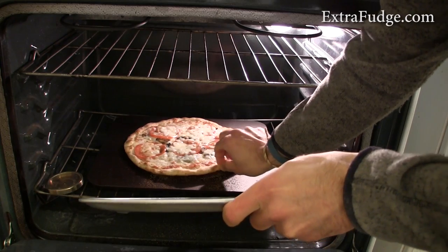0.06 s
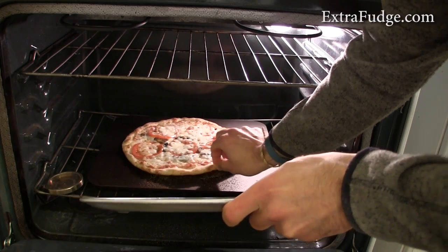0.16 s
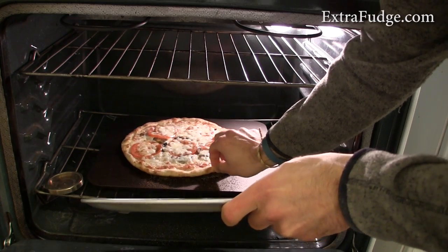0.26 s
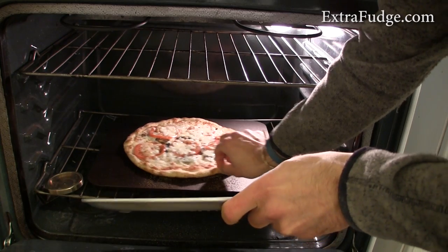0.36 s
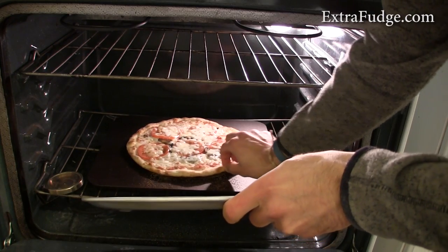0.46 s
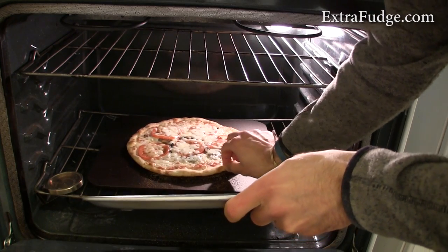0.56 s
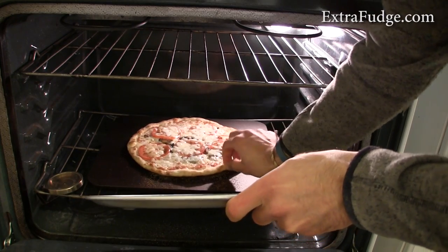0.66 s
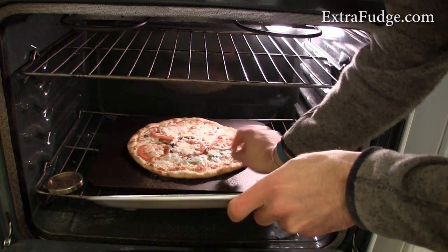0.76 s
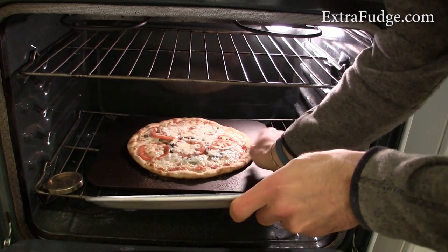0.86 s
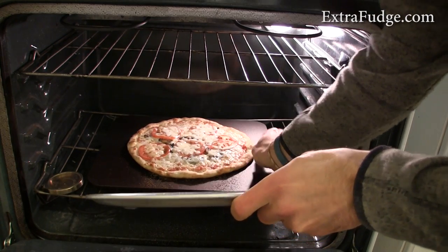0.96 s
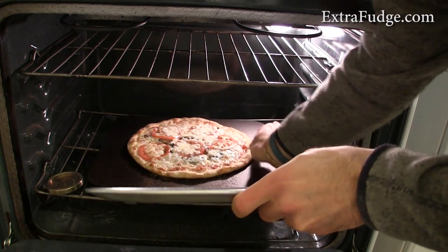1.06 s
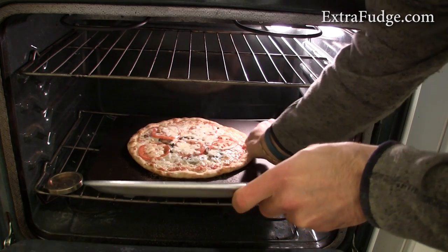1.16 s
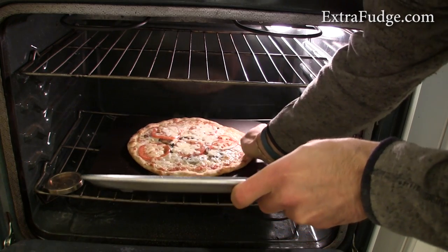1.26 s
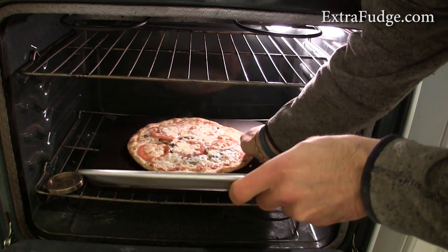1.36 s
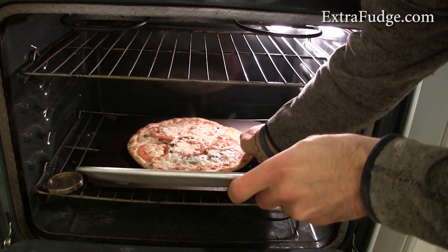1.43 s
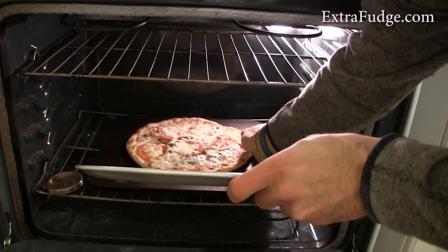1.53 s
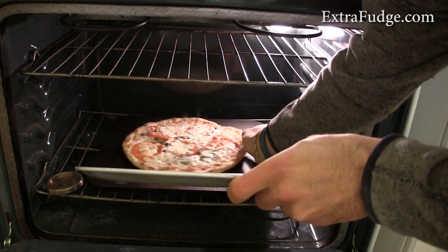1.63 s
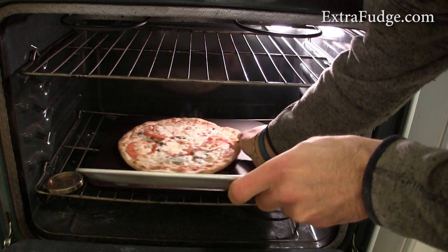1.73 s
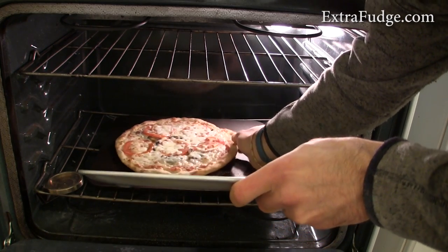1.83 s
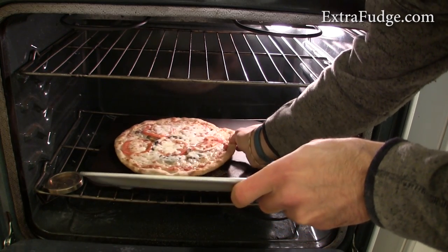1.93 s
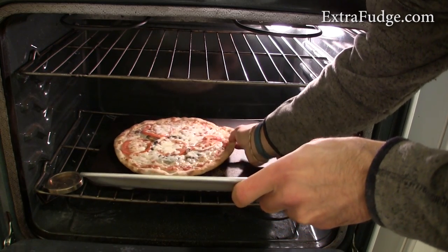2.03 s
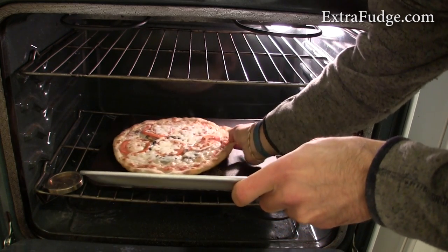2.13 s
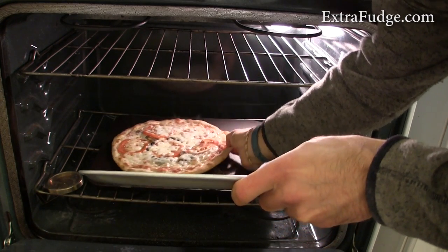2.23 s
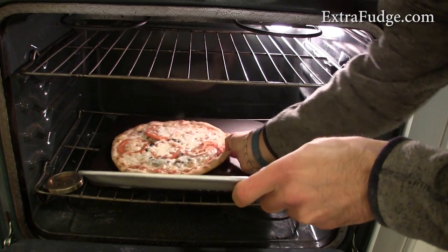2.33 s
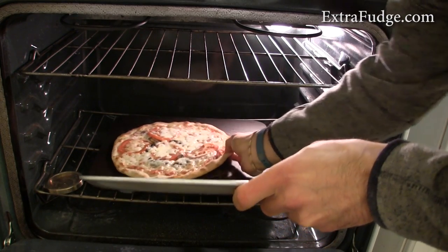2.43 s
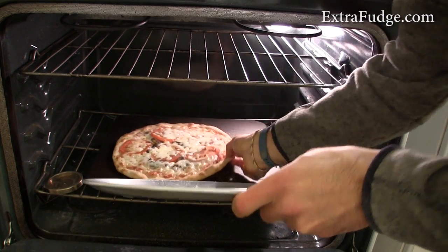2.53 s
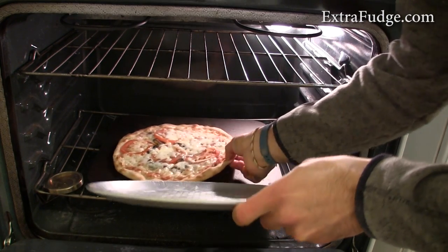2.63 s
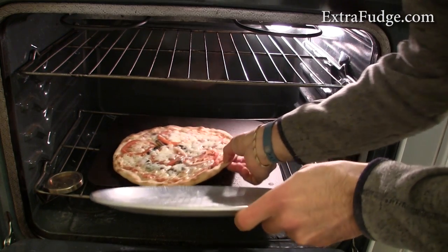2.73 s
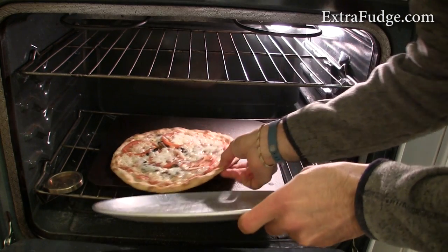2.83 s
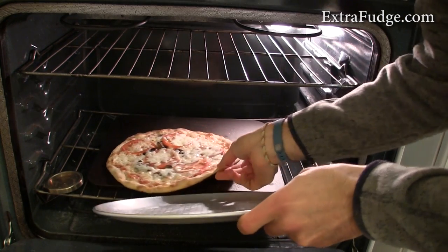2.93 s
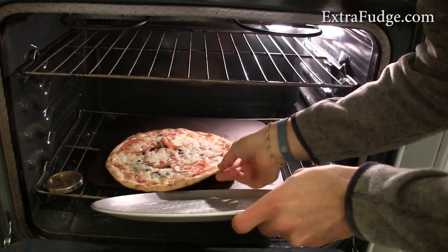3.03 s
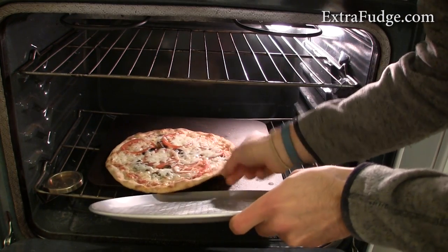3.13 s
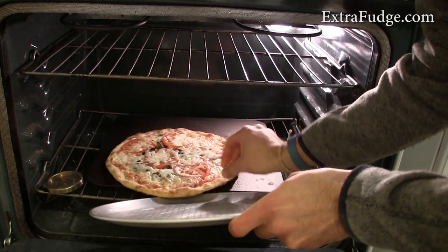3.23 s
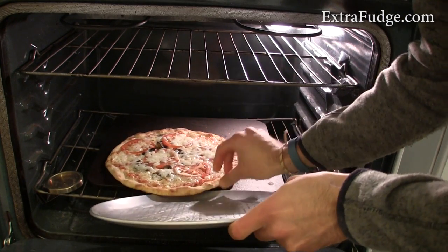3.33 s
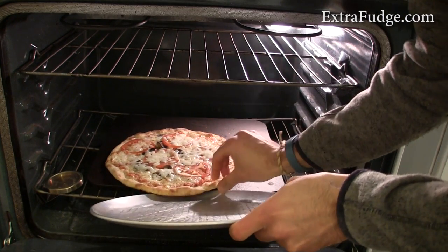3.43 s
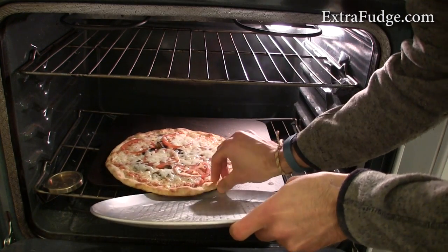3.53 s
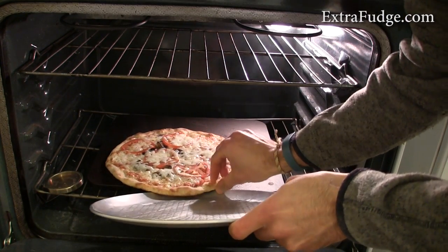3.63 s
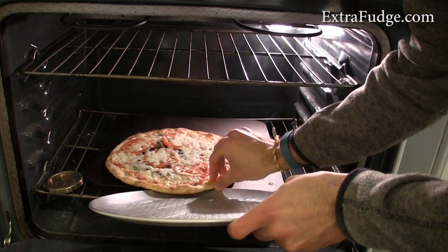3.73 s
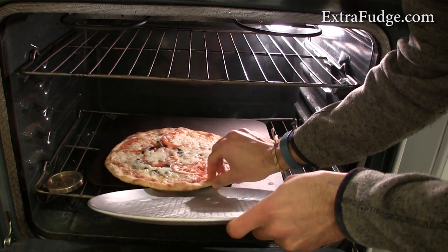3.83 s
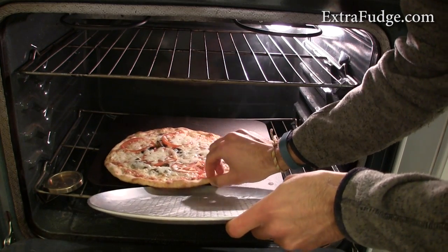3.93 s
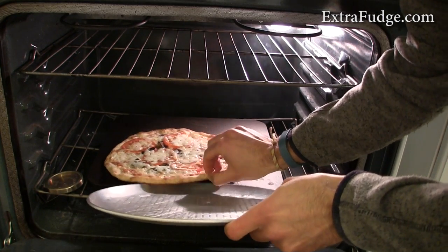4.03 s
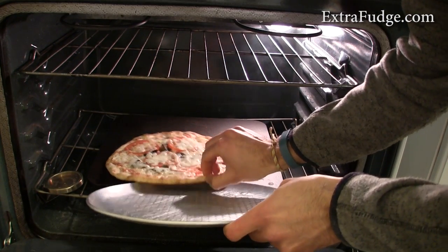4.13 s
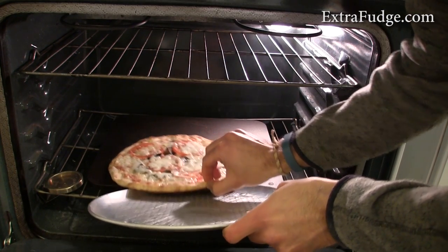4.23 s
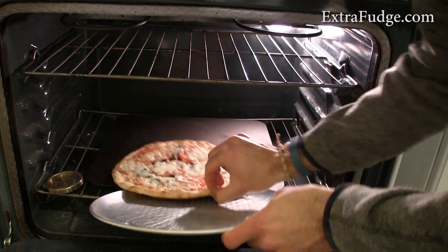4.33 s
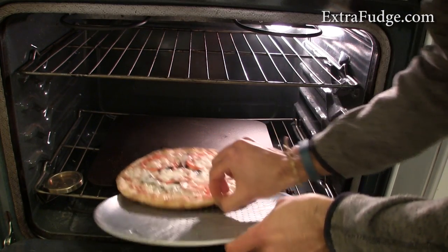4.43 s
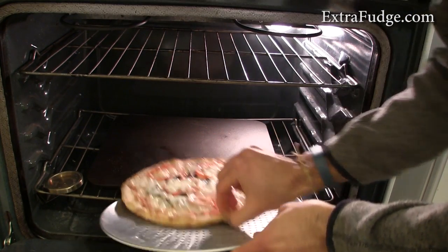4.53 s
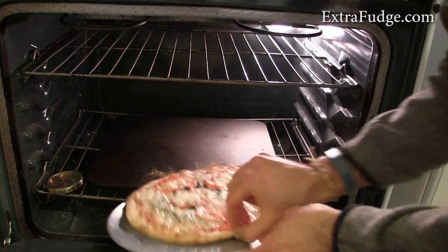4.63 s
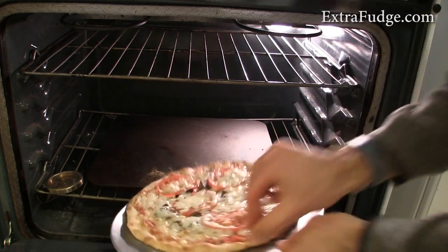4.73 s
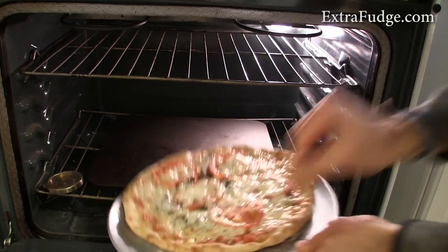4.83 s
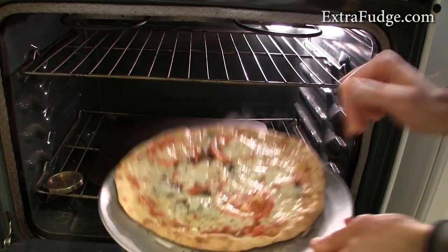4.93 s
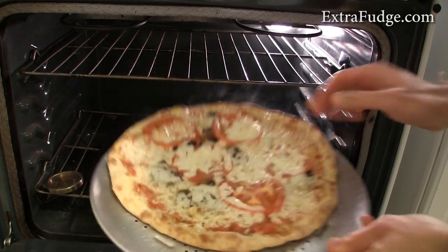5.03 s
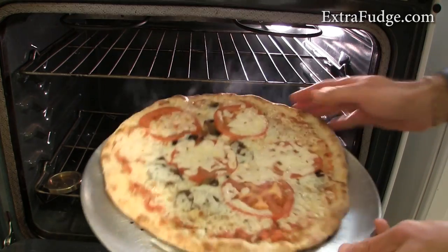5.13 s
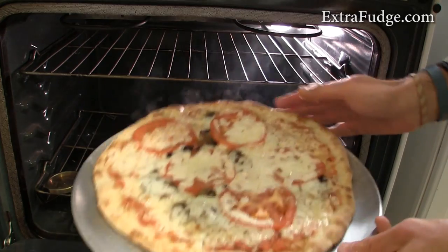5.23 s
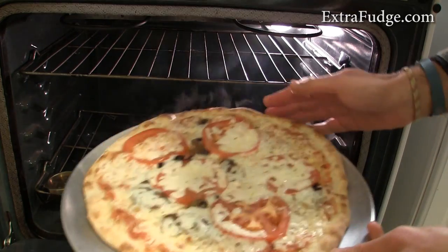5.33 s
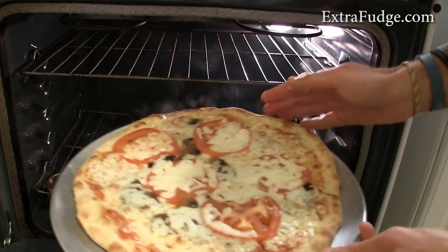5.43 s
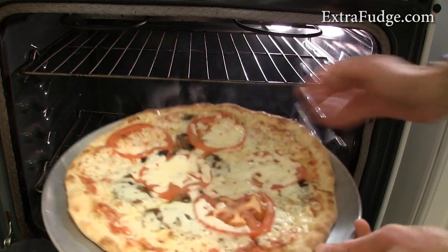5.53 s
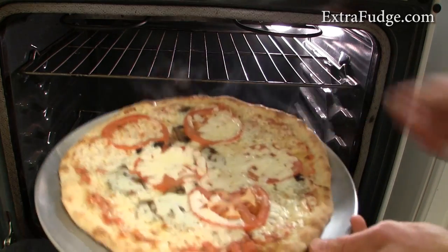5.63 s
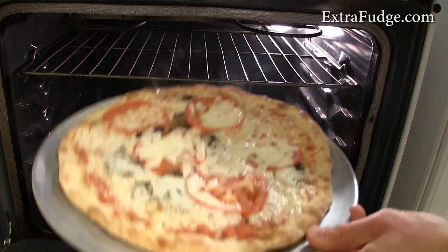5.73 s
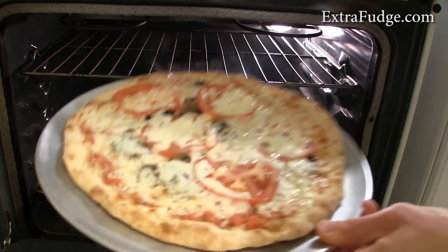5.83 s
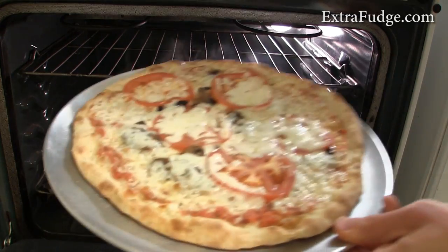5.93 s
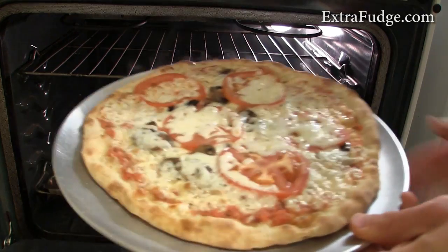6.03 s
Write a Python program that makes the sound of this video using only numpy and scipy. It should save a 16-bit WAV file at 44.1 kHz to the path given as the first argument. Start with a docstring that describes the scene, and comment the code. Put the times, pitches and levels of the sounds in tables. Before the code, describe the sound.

Rough, uneven scraping of pizza crust on steel in an oven, with short metal knocks, small crackles and faint sizzling.

```python
"""A baked pizza is dragged in jerks over a steel slab in an open oven and slides onto a thin metal pan.
Crumbs of crust catch and slip in a dense rasp that rings the slab, then the pan. Metal knocks, crust
cracks, fat crackles and sleeves rustle around it, over a faint bed of air, sizzling cheese and oven hum.
Close and mono, in a small kitchen."""
import sys
import numpy as np
from scipy import signal
from scipy.fft import rfft, irfft
from scipy.io import wavfile
from scipy.ndimage import uniform_filter1d

SR = 44100
rng = np.random.default_rng(int(sys.argv[2]) if len(sys.argv) > 2 else 0)


def master_out(mix):
    """Clip the mix to full scale and print it as 16-bit PCM to the path in sys.argv[1]."""
    frames = np.transpose(np.atleast_2d(mix))
    ceiling = np.clip(frames, -1, 1)
    pcm = np.round(ceiling * 32767).astype(np.int16)
    wavfile.write(sys.argv[1], SR, pcm)


N = 267687
T = np.arange(N) / SR

# Tone curves of the kitchen bed and of crust rasping on slab and pan: f/Hz, level/dB
BED_EQ = [(25, -13), (116, -2), (361, -3), (672, 2), (1050, -6.5), (1930, -31.5), (2200, -26), (3490, -19),
          (4950, -33.5), (5670, -24), (6310, -82), (13400, -21), (15800, -36)]
SLAB_EQ = [(35, -43), (60, -34), (136, -10), (227, -7.5), (300, -7.5), (361, -11.5), (406, -3), (604, -3),
           (1270, -6.5), (1650, -5.5), (3310, -8), (8220, -9), (12500, -4.5), (15800, -14)]
PAN_EQ = [(35, -110), (60, -39), (255, 4), (379, -11.5), (489, 0), (604, -1.5), (919, -1.5), (1220, -6),
          (12800, -8.5), (15800, -11.5)]
# Resonances and dips laid over a tone curve: f/Hz, width/Hz, level/dB
RUSTLE_MODES = [(5300, 150, 12), (10500, 200, 5), (12200, 500, 4)]
SLAB_MODES = [(145, 25, 7), (230, 20, 4), (410, 40, 3), (660, 80, 3), (940, 40, 4), (1184, 30, 4),
              (1420, 40, 4), (1650, 35, 5), (1775, 35, 4), (2070, 80, 4), (2350, 40, 3), (3044, 80, 3),
              (3320, 70, 3), (4015, 50, 4), (5600, 700, 3)]
BACK_MODES = [(160, 120, -6), (455, 100, 5), (700, 200, -3), (1300, 250, -3), (910, 90, 6), (2200, 300, -7),
              (2850, 450, 4)]  # pizza at the back of the slab
EDGE_MODES = [(3400, 1000, 4)]  # pizza at its edge
PAN_MODES = [(490, 50, 5), (921, 95, 4), (1100, 150, -5), (1457, 15, 5), (1750, 40, 4), (2190, 60, 5),
             (2730, 50, 4), (4020, 40, 4), (4450, 400, -5), (4730, 70, 3), (5680, 70, 4), (6180, 70, 5),
             (7020, 280, 4), (8780, 100, 4), (12500, 400, 3)]
OVEN_NOTCH = (4860, 380, -11)  # the cavity swallows one band
# Pitches of small bursting fat bubbles: f/Hz
BUBBLE_HZ = (1500, 2700, 3600, 5700, 7200, 9000, 11000, 13000)
# Sleeves and fingers: t/s, level/dB
RUSTLES = [(.9, -68), (1.42, -69), (3.378, -58), (5.52, -66), (5.878, -66.5)]
# Crust cracks and fat spits: t/s, peak level/dB, f/Hz
CRACKS = [(0.663, -53, 4500), (1.432, -46, 10200), (2.167, -32, 12200), (2.179, -31, 12700),
          (2.194, -28, 12800), (2.217, -39, 9000), (3.0594, -35, 11000), (3.281, -49, 11000),
          (4.816, -21, 4800), (5.512, -45, 11500), (5.558, -49.5, 5500), (5.879, -51, 5600)]
# Blows on the metal: t/s, peak level/dB ahead of the pan's resonances, f/Hz, t60/s
BLOWS = [(0.346, -44, 1740, 0.036), (0.413, -36, 1810, 0.022), (0.711, -43.5, 2780, 0.097),
         (0.863, -42, 610, 0.12), (0.865, -47, 3000, 0.06), (2.009, -46, 640, 0.051),
         (2.167, -37.5, 614, 0.034), (2.199, -38.5, 443, 0.039), (3.247, -44.5, 400, 0.13),
         (3.844, -41, 3500, 0.03), (4.813, -23.5, 830, 0.03), (4.818, -23, 750, 0.04),
         (5.329, -35.5, 434, 0.12)]
# The pan's one long ring after the loudest knock: t/s, f/Hz, peak level/dB, t60/s
LONG_RING = (4.813, 1457, -54, .95)
# Short shoves at speed: start t/s, end t/s, start level/dB, end level/dB, attack/s, release/s,
# then band trims: low mid/dB, high mid/dB, treble/dB
SHORT_SHOVES = [(0.147, 0.298, -57, -57, 0.086, 0.11, -6, -1.5, -14),
                (0.456, 0.548, -49, -55.5, 0.06, 0.081, -2.5, 1.5, -9.5),
                (0.709, 0.746, -58, -66.5, 0.02, 0.033, -5, 1, -20),
                (0.831, 0.849, -64, -60.5, 0.057, 0.024, -9, -13, -5),
                (1.5, 1.644, -75.5, -66.5, 0.041, 0.056, 7.5, 4, -9),
                (1.671, 1.92, -50.5, -52.5, 0.062, 0.077, 2, 3.5, -10),
                (2.034, 2.052, -54.5, -54.5, 0.059, 0.067, -1.5, 0, -15),
                (3.883, 3.955, -66, -67, 0.052, 0.068, 7.5, 13, -1.5),
                (5.265, 5.4, -45.5, -45, 0.075, 0.055, 3.5, 1.5, 2.5),
                (5.453, 5.471, -53, -60.5, 0.023, 0.033, 10.5, 7, 8.5)]
# Breakpoints of the two long pulls: t/s, level/dB, then band trims: low mid/dB, high mid/dB, treble/dB
LONG_PULLS = [
    [(2.14, -68, -3, -9, -3), (2.17, -63.5, 6.5, 5.5, 1), (2.27, -47.5, -7.5, -3, -16),
     (2.45, -51.5, 1, 3, -13), (2.68, -47, -7.5, -3, -15), (2.74, -50, -2, -0.5, -15),
     (2.92, -50, 3.5, 8, -8), (3.05, -54.5, 10, 8.5, -7), (3.065, -56.5, 11.5, 9, 9),
     (3.17, -58, -2.5, -9.5, -10.5), (3.285, -66.5, 1, -20, -3), (3.4, -65.5, -4, 6, -11)],
    [(4.02, -71.5, -1, 8, -6), (4.12, -52.5, 3, 8, -3.5), (4.23, -39.5, -5, 2.5, -9), (4.32, -52, 9, 12, 1),
     (4.5, -51.5, 13.5, 14.5, 6), (4.57, -47.5, 14.5, 8.5, 4), (4.66, -35, -6, -4, -7),
     (4.745, -43, 0.5, 0.5, 2.5), (4.8, -49.5, 2.5, 1, -4), (4.82, -52.5, 4, 7.5, 4.5),
     (4.87, -61.5, 2, 4, -10), (4.96, -86, 6, 3, 3)],
]
# Faint hiss of the resting crust: level/dB, then the same three trims
REST_ON_SLAB, REST_ON_PAN = (-71.5, -9, -7, -3.5), (-67.5, -16, -12.5, -10)
# The pizza's path, as crossfade points: t/s
LEAVES_BACK_S, AT_EDGE_S = (2.08, 2.16), (4.28, 4.47, 4.55, 4.63)
ONTO_PAN_S, CARRIED_CLOSE_S = (4.7, 5.0), (5.1, 5.9)


def undb(db):
    """Decibels to gain."""
    return 10 ** (np.asarray(db) / 20)


def level(x, db):
    """Set the RMS level."""
    return x * undb(db) / np.sqrt(np.mean(x ** 2))


def colour(x, curve, modes=()):
    """Minimum-phase EQ: a smooth tone curve with resonances on it."""
    size = 2 ** 14
    f = np.maximum(np.fft.rfftfreq(size, 1 / SR), 1)
    hz, db = np.transpose(curve)
    power = undb(2 * np.interp(np.log(f), np.log(hz), db))
    for mode_hz, width, peak_db in modes:
        power = power * (1 + (undb(2 * peak_db) - 1) / (1 + (2 * (f - mode_hz) / width) ** 2))
    cepstrum = irfft(np.log(power) / 2)
    cepstrum[1:size // 2] *= 2  # folded forward, so the ring follows the hit
    cepstrum[size // 2 + 1:] = 0
    return signal.oaconvolve(x, irfft(np.exp(rfft(cepstrum))))[:len(x)]


def band(x, lo_hz, hi_hz, order=2):
    """Gentle band-pass."""
    sos = signal.butter(order, [lo_hz, min(hi_hz, 20000)], "band", fs=SR, output="sos")
    return signal.sosfilt(sos, x)


def lows(x, hz):
    """Zero-phase low-pass; subtract it to get the highs."""
    return signal.sosfiltfilt(signal.butter(2, hz, fs=SR, output="sos"), x)


def drift(per_s):
    """Smoothed sample-and-hold modulator with an RMS of 1."""
    held = rng.standard_normal(4000)[(T * per_s).astype(int) % 4000]
    hold = int(SR / per_s)
    return level(uniform_filter1d(uniform_filter1d(held, hold), hold), 0)


def grains(per_s, cap_db, spread_db=2.5):
    """Random clicks, many small and a few large."""
    chance, polarity, size = rng.random((3, N))
    size_db = np.minimum(-spread_db * np.log(size + 1e-9), cap_db)
    return (chance < per_s / SR) * np.sign(polarity - .5) * undb(size_db)


def burst(at_s, peak_db, hz, t60, edge_ratio, strike=5):
    """A click with a short noise tail, filtered around one pitch."""
    t = np.arange(SR // 5) / SR
    hit = (rng.standard_normal(len(t)) + strike * (t == 0)) * undb(-60 * t / t60)
    hit = band(hit, hz / edge_ratio, hz * edge_ratio, order=1)
    hit = hit * undb(peak_db) / np.abs(hit).max()
    return np.bincount(int(at_s * SR) + np.arange(len(t)), hit, N + SR)[:N]


def room(x, t60=.5, treble_t60=.073, wet_db=-24):
    """A dense kitchen tail that loses its treble first."""
    t = np.arange(SR // 2) / SR
    noise = rng.standard_normal(len(t)) * (t > .003)
    body = band(noise, 53, 2200, order=1)
    tail = body * undb(-60 * t / t60) + (noise - body) * undb(-60 * t / treble_t60)
    return x + signal.oaconvolve(x, tail / np.linalg.norm(tail) * undb(wet_db))[:N]


def oven(x, count=12, t60=.09, wet_db=-6, shifts_per_s=30):
    """Sheet walls and racks ring; cycling through short tails suggests hands and pizza moving."""
    t = np.arange(SR // 5) / SR
    out = x
    for k in range(count):
        ring = rng.standard_normal(len(t)) * undb(-60 * t / t60) * (t > .001)
        send = np.maximum(np.cos(2 * np.pi * (T * shifts_per_s - k) / count), 0) * np.sqrt(4 / count)
        out = out + signal.oaconvolve(x * send, ring / np.linalg.norm(ring) * undb(wet_db))[:N]
    return out / np.sqrt(1 + undb(2 * wet_db))


def kitchen_bed(hum_hz=118, hum_db=-80.5):
    """Wavering air, a sizzle of bursting fat bubbles that flares and dies down, and mains hum."""
    air = level(colour(rng.standard_normal(N), BED_EQ), db=-67.5)
    flare = undb(1.5 * drift(per_s=9))
    bubbles = sum(band(grains(per_s=160, cap_db=7), hz / 1.12, hz * 1.12) / np.sqrt(hz)
                  for hz in BUBBLE_HZ)
    sizzle = level(colour(bubbles * flare, BED_EQ), db=-68)
    hum = undb(hum_db + 1.8 * drift(per_s=22)) * np.sqrt(2) * np.sin(2 * np.pi * hum_hz * T)
    return oven(air * undb(2.7 * drift(per_s=17)) + sizzle) + hum


def fat_crackle(far_db=-75.5, near_db=-69):
    """Sparse dry clicks of hot fat, louder as the pizza is carried close."""
    clicks = level(band(grains(per_s=70, cap_db=8), 2500, 10000), 0)
    return clicks * undb(np.interp(T, CARRIED_CLOSE_S, (far_db, near_db)))


def sleeve_rustle(rise_db_per_s=504, fade_db_per_s=138):
    """Sleeves and fingers brush in bright, fibrous grains: fast attack, slower fade."""
    bright_eq = [(2500, -6), (4800, -2), (5600, 3), (9500, 0), (13000, 3), (16000, -14)]
    fibres = colour(grains(per_s=3500, cap_db=15, spread_db=3), bright_eq, RUSTLE_MODES)
    envelope = sum(undb(db + np.minimum(rise_db_per_s * (T - s), fade_db_per_s * (s - T)))
                   for s, db in RUSTLES)
    return level(fibres, 0) * envelope


def crust_cracks():
    """Crust snaps and fat spits in dry, bright ticks."""
    return sum(burst(s, db, hz, t60=.036, edge_ratio=1.15) for s, db, hz in CRACKS)


def pan_knocks():
    """Blows ring the thin pan; one mode sings on after the loudest."""
    blows = sum(burst(s, db, hz, t60, edge_ratio=1.25) for s, db, hz, t60 in BLOWS)
    s, hz, db, t60 = LONG_RING
    since = np.maximum(T - s, 0)
    ring = np.sin(2 * np.pi * hz * since) * undb(db - 60 * since / t60)
    return colour(blows, [(20, 0), (20000, 0)], PAN_MODES) + ring


def slab(push, strong=1.4, weak=.3):
    """The steel's tone follows the pizza's place; odd and even modes trade off as the contact wanders."""
    back = np.interp(T, LEAVES_BACK_S, (1, 0))
    edge = np.interp(T, AT_EDGE_S, (0, 1, 1, 0))
    sway = (1 + np.tanh(drift(per_s=8))) / 2
    out = 0
    for share, emphasis in ((sway, (strong, weak)), (1 - sway, (weak, strong))):
        modes = [(hz, width, db * emphasis[k % 2]) for k, (hz, width, db) in enumerate(SLAB_MODES)]
        for here, place_modes in ((back, BACK_MODES), (edge, EDGE_MODES), (1 - back - edge, [])):
            out = out + colour(push * share * here, SLAB_EQ, modes + place_modes + [OVEN_NOTCH])
    return out


def shove(start_s, end_s, start_db, end_db, attack_s, release_s, arch_db=2):
    """One shove's envelope rides the speed up, arches slightly midway and rides it down."""
    along = np.interp(T, (start_s, end_s), (0, 1))
    speed = np.interp(T, (start_s - attack_s, start_s, end_s, end_s + release_s), (0, 1, 1, 0))
    return undb(start_db + (end_db - start_db) * along + arch_db * np.sin(np.pi * along)) * speed ** .96


def rasp_faders(pan_share):
    """Gains of low mid, body, high mid and treble: rest, shoves and pulls add in power."""
    def band_power(gain, low_mid_db, high_mid_db, treble_db):
        return np.array([gain * undb(db) for db in (low_mid_db, 0, high_mid_db, treble_db)]) ** 2

    rest_db, *trims = (a + (b - a) * pan_share for a, b in zip(REST_ON_SLAB, REST_ON_PAN))
    power = band_power(undb(rest_db), *trims)
    for row in SHORT_SHOVES:
        power += band_power(shove(*row[:6]), *row[6:])
    for pull in LONG_PULLS:
        times, *columns = np.transpose(pull)
        pull_db, *trims = (np.interp(T, times, column) for column in columns)
        power += band_power(undb(pull_db) * (T > times[0]) * (T < times[-1]), *trims)
    return np.sqrt(power)


def pizza_drag(judder_db=1.5):
    """Crumbs catch and slip under the crust in a dense, uneven rasp that rings slab, then pan."""
    slips = grains(per_s=12000, cap_db=12) * undb(drift(per_s=30))
    pan_share = np.interp(T, ONTO_PAN_S, (0, 1))
    faders = rasp_faders(pan_share)
    deep, low, mid, high = (lows(slips, hz) for hz in (330, 1000, 2250, 4800))
    thrum = deep * undb(np.interp(T, (4.4, 4.46), (0, -13.5)))  # thins as the weight leaves the slab
    thrum *= np.sqrt(faders[0] / faders[1])  # rides halfway between the low mid and body faders
    low_mid, body, high_mid, treble = low - deep, thrum + mid - low, high - mid, slips - high
    on_slab = on_pan = 0
    for part, fader in zip((low_mid, body, high_mid, treble), faders):
        push = part * fader * undb(judder_db * drift(per_s=70))  # each band stutters on its own
        on_slab += push * np.sqrt(1 - pan_share) / np.std(colour(part, SLAB_EQ, SLAB_MODES))
        on_pan += push * np.sqrt(pan_share) / np.std(colour(part, PAN_EQ, PAN_MODES))
    return slab(on_slab) + colour(on_pan, PAN_EQ, PAN_MODES)


def scene():
    """Drag, rustle and crackle ring the oven, join the hits in the room and sit on the bed."""
    in_oven = oven(pizza_drag() + sleeve_rustle() + fat_crackle())
    mono = room(in_oven + pan_knocks() + crust_cracks()) + kitchen_bed()
    return np.array([mono, mono])


def record(dry, top_hz=15715):
    """A steep high cut on the master."""
    return signal.sosfilt(signal.ellip(16, .3, 70, top_hz, fs=SR, output="sos"), dry)


dry = scene()
out = record(dry)
master_out(out)
```